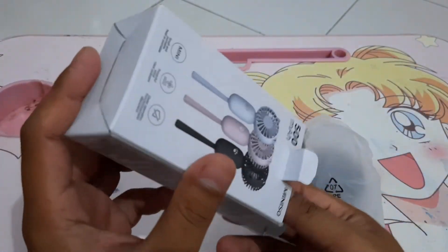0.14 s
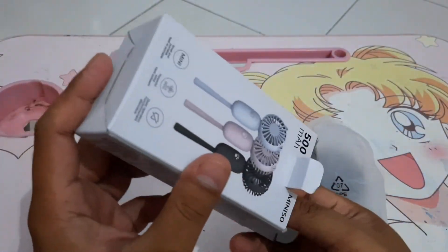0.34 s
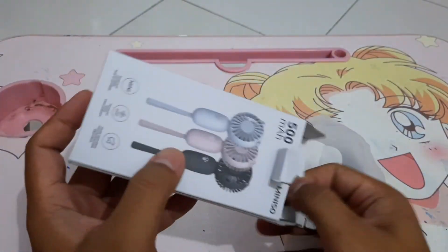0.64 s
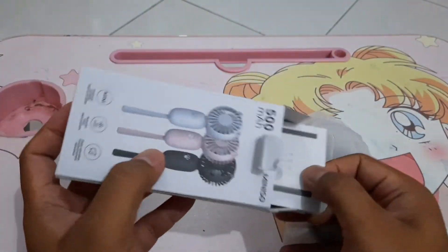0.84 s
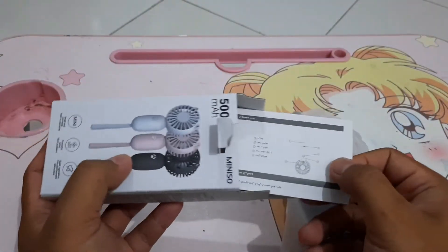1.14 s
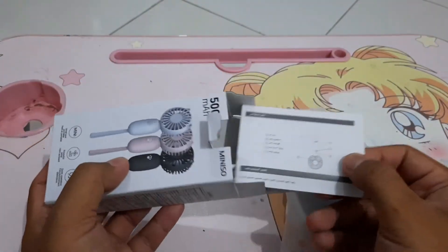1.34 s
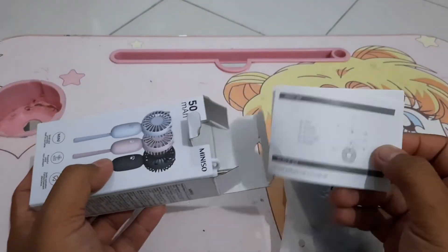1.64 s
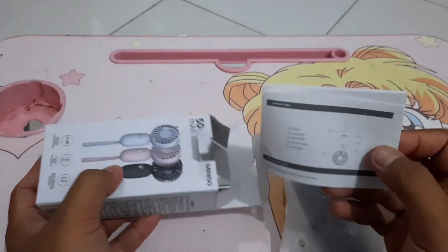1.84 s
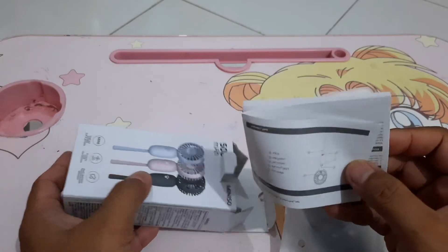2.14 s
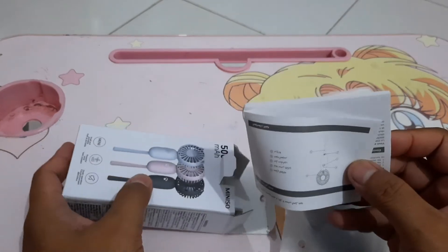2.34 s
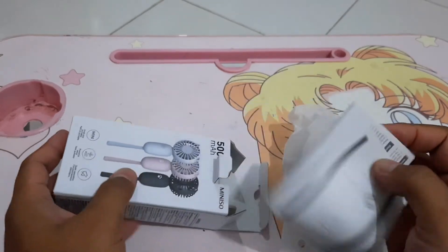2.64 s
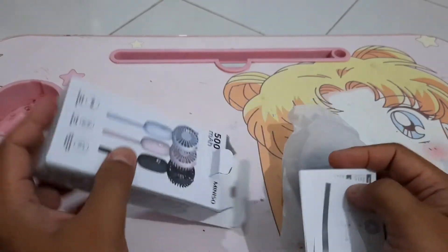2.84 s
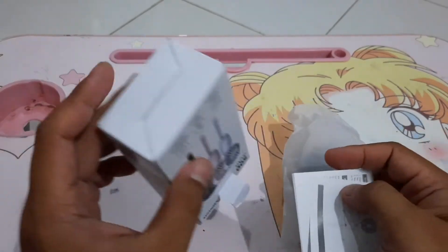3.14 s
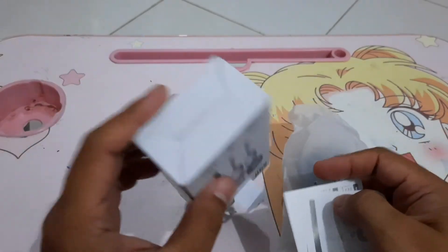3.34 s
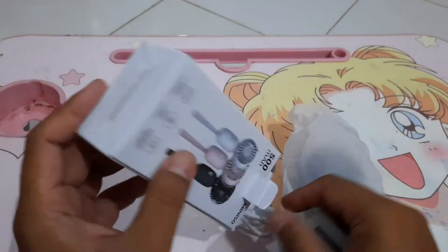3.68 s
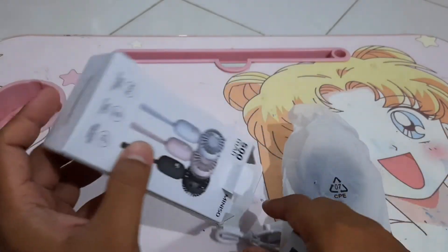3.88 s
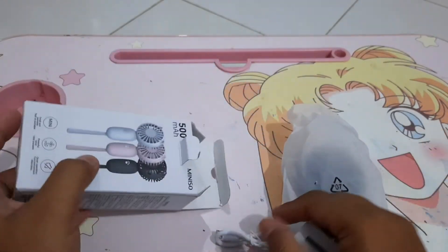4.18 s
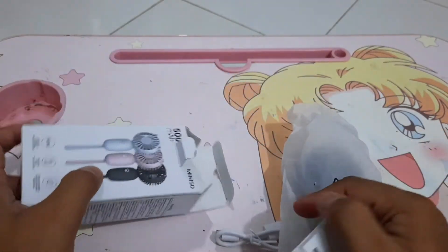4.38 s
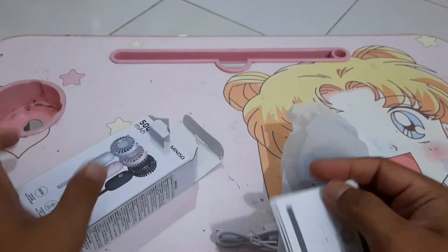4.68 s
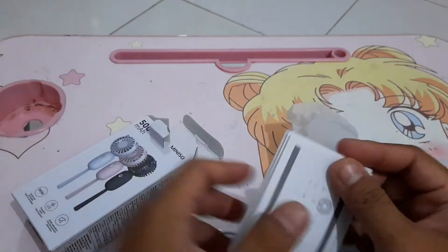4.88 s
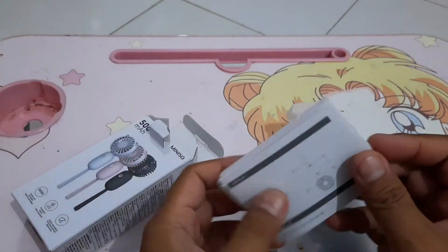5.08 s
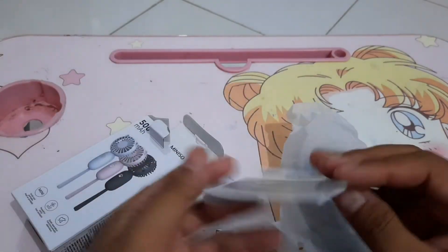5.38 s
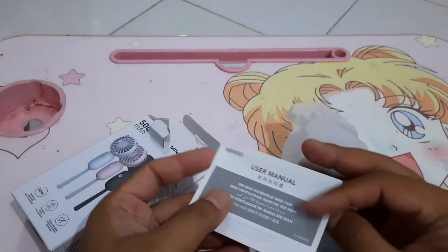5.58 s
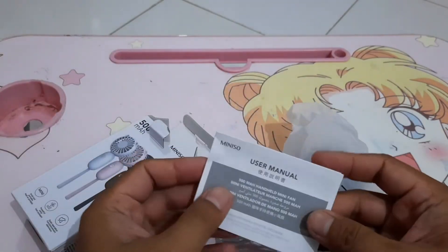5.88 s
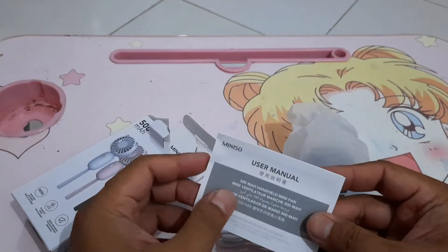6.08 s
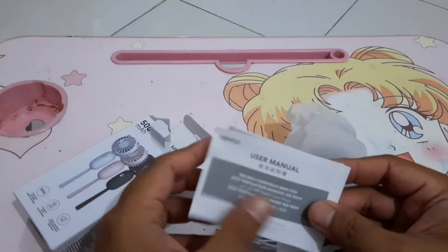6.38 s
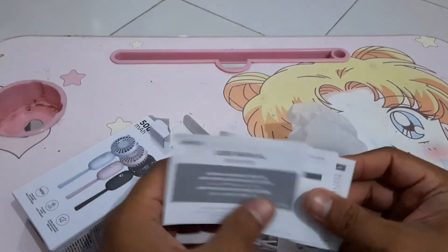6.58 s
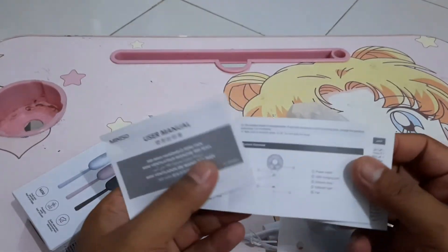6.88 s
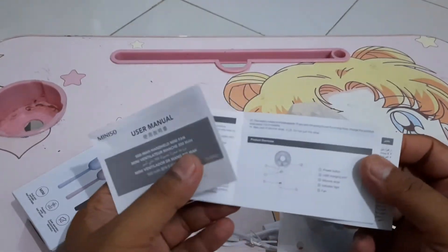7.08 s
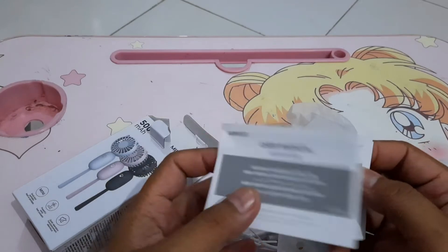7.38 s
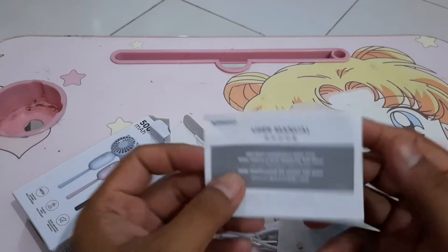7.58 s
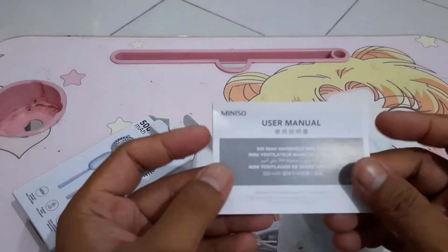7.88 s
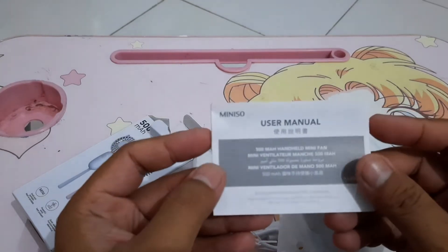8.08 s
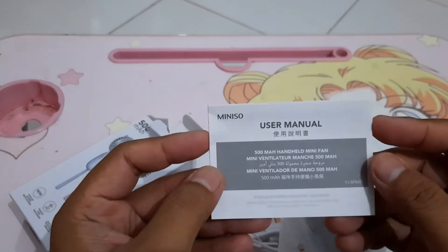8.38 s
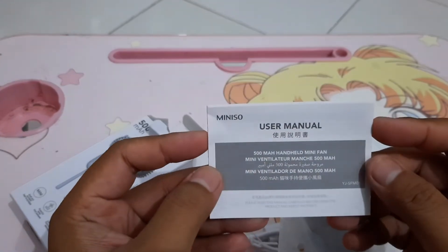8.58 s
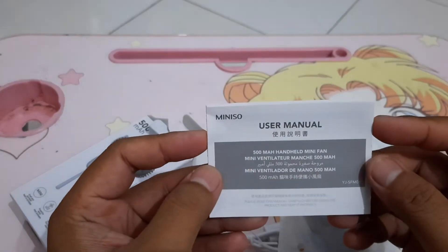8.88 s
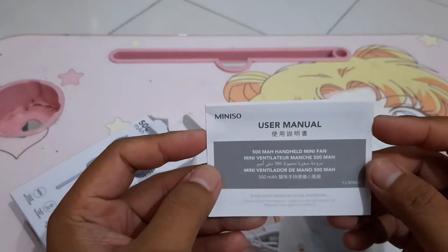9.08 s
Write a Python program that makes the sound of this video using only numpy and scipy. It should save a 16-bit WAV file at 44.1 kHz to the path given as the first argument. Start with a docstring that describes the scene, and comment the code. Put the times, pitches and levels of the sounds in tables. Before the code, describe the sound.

Close handling of a thin card box with hollow scrapes and a burst of knocks, a hard drop, then quiet leaflet rustling indoors.

```python
"""Hands shake a small cardboard box, pull a folded leaflet out of it, drop the box on a table mat
and unfold the leaflet, close to a two-port microphone in a quiet room with a low wavering drone.
Rubbing, sliding and creasing are shaped noise; blows ring the box's resonances and card panels pop
on single notes. Echoes make the room's tail; its air is soft hush, drone lines and a swelling rumble."""
import sys
import numpy as np
from scipy import signal
from scipy.fft import rfft, irfft
from scipy.io import wavfile
from scipy.ndimage import uniform_filter1d

SR = 44100
rng = np.random.default_rng(int(sys.argv[2]) if len(sys.argv) > 2 else 0)


def master_out(mix):
    """Clip the mix to full scale and print it as 16-bit PCM to the path in sys.argv[1]."""
    frames = np.transpose(np.atleast_2d(mix))
    ceiling = np.clip(frames, -1, 1)
    pcm = np.round(ceiling * 32767).astype(np.int16)
    wavfile.write(sys.argv[1], SR, pcm)


N = 407043  # length of the scene [samples]

# resonances (modes) of the box: (pitch [Hz], basic width [Hz], relative level [dB])
BOX_MODES = [(325, 96, 11.5), (522, 145, 8.5), (758, 120, 7.5), (937, 190, 7.5), (1404, 240, 3),
             (1670, 78, 2.5), (1844, 160, 4.5), (2170, 190, -2.5), (2485, 780, -8), (3030, 282.5, -7.5),
             (3680, 2200, -12)]
# how far the left port leads for sounds from the hands: (frequency [Hz], lead [radians])
LEFT_LEAD = [(250, 0), (900, .9), (2200, 1.5), (4500, 1.1), (8000, .3)]


def gain_of(db):
    """Turns decibels into a factor."""
    return 10 ** (np.asarray(db) / 20)


def evened(x):
    """Scales a signal to an average (rms) strength of 1."""
    return x / np.sqrt(np.mean(x ** 2) + 1e-20)


def read(points, hz):
    """Reads a table of (frequency, value) at any frequency, on a log-frequency axis."""
    f, value = np.transpose(points)
    return np.interp(np.log(hz + 1), np.log(f + 1), value)


def columns(rows, t):
    """Reads each column of a table of (time, values...) at the times t."""
    s, *rest = np.transpose(rows)
    return [np.interp(t, s, column) for column in rest]


def add(mix, s, sound):
    """Mixes a sound in at s seconds."""
    part = mix[round(s * SR):][:len(sound)]
    part += sound[:len(part)]


def resonate(x, hz, width):
    """Sends a sound through a two-pole resonance with gain 1 at its peak."""
    return signal.lfilter(*signal.iirpeak(hz, hz / width, SR), x)


def highpass(x, order, hz):
    """Takes away what lies below hz."""
    return signal.sosfilt(signal.butter(order, hz, "high", fs=SR, output="sos"), x)


def glide(hz, width):
    """Noise through a steep resonance that follows the pitch curve hz."""
    turn = np.exp(2j * np.pi * np.cumsum(hz) / SR)
    pole = np.exp(-np.pi * width / SR)
    # shift the noise down by the pitch, keep what is near zero, shift it back up
    lowered = rng.standard_normal(len(hz)) / turn
    narrow = signal.lfilter([1], np.poly([pole, pole]), lowered)
    return evened((turn * narrow).real)


def grit():
    """Friction: dense noise whose strength jitters within milliseconds, with sparse harder slips."""
    jitter = evened(uniform_filter1d(rng.standard_normal(N), size=60))
    hits = (rng.random(N) < 150 / SR) * rng.random(N)  # about 150 slips a second
    slips = signal.lfilter([1], [1, -.97], hits)  # each dies away at once
    return evened(rng.standard_normal(N) * gain_of(2.5 * jitter) * (1 + 2.2 * slips))


def paper_bands():
    """Grit in the colour of paper, split into a dull and a bright part."""
    # colour of paper noise: (frequency [Hz], relative level per Hz [dB])
    paper_colour = [(900, -16), (2000, 3), (3200, -7), (4500, -12.5), (6500, -13), (10000, -16.5),
                    (13000, -15.5), (16000, -23.5)]
    hz = np.fft.rfftfreq(N, 1 / SR)
    spectrum = rfft(grit()) * gain_of(read(paper_colour, hz))
    bright = 1 / (1 + (4500 / (hz + 1)) ** 6)  # the split lies at 4500 Hz
    return evened(irfft(spectrum * (1 - bright), N)), evened(irfft(spectrum * bright, N))


def strokes(rows, rise_db_s, fall_db_s):
    """Strength curves of strokes that set in, glide in level and let go: main part first, then others."""
    t = np.arange(N) / SR
    power = np.zeros((len(rows[0]) - 3, N))
    for s, length, start_db, end_db, *parts_db in rows:
        near = slice(max(round((s - .3) * SR), 0), round((s + length + .4) * SR))
        u = t[near] - s
        db = np.interp(u, [0, length], [start_db, end_db])
        db = db + rise_db_s * np.minimum(u, 0)
        db = db - fall_db_s * np.maximum(u - length, 0)
        # the other parts follow the main one at their own offsets
        power[:, near] += gain_of(db + np.r_[0, parts_db][:, None]) ** 2
    return np.sqrt(power)


def rubbing():
    """Friction of card on card drives the box modes; a loose grip frees the hollow low ones."""
    # strokes of card along card: (start [s], length [s], level at start [dB], level at end [dB],
    # hollow low modes over that level [dB], surface hiss over that level [dB])
    card_strokes = [(0.03, 0.14, -51, -70.5, 4, -12), (0.15, 0.14, -46.5, -62.5, -2, -12),
                    (0.34, 0.053, -55, -54.5, -8, -15), (0.54, 0.077, -40.5, -45, -2, -17.5),
                    (0.68, 0.038, -38, -31.5, -13.5, -22.5), (0.73, 0.047, -45, -48, -2, -12.5),
                    (0.89, 0.19, -47, -47, -11, -14), (1.145, 0.058, -45, -46, -11.5, -15),
                    (1.31, 0.13, -54, -47.5, -16.5, -13.5), (1.492, 0.0091, -39, -45.5, -4, -6),
                    (2.15, 0.13, -62, -59.5, -3, -16), (3.0, 0.057, -52.5, -39.5, 4, -15.5),
                    (3.1, 0.25, -59, -52, 7.5, -14.5), (3.36, 0.072, -46, -49, 4.5, -15.5),
                    (3.455, 0.037, -45, -45.5, 6, -19), (3.58, 0.2, -38.5, -38.5, -2.5, -19.5),
                    (3.81, 0.035, -39.5, -35.5, -4, -15), (3.88, 0.1, -49, -58, -2.5, -13),
                    (4.155, 0.27, -55.5, -75, 3.5, -14.5), (4.455, 0.056, -52, -45.5, -14, -17.5),
                    (4.575, 0.19, -33.5, -54, -1.5, -15.5)]
    # how fast a stroke sets in and lets go [dB/s]
    level, hollow, hiss = strokes(card_strokes, rise_db_s=489, fall_db_s=361.5)
    drive, modes = grit(), []
    for hz, width, db in BOX_MODES:
        # shifting fingers feed each mode unevenly, in steps of 10 ms
        grip = evened(uniform_filter1d(rng.standard_normal(N // 441 + 1), size=6))
        grip = np.repeat(grip, 441)[:N]
        rough = drive * rng.choice([-1, 1], N) * gain_of(2.0 * grip)
        ringing = resonate(resonate(rough, hz, 0.9 * width), hz, 2.2 * width)
        modes.append(gain_of(db) * ringing)
    low_modes, high_modes = evened(sum(modes[:2])), evened(sum(modes[2:]))
    return hollow * low_modes + level * high_modes + hiss * paper_bands()[1]


def knocks():
    """Each blow slaps twice within milliseconds and rings the modes nearest its pitch, with a short crack."""
    # blows on the box: (time [s], peak of the ring before the filters below [dB],
    # favoured pitch [Hz], crack over the ring [dB])
    blows = [(0.017, -20.5, 426, -6), (0.145, -24.5, 990, -5.5), (0.463, -29.5, 1190, -17),
             (0.553, -22, 1020, -6), (0.582, -21, 3140, -6), (1.14, -37, 700, -22), (1.489, -43, 670, -21),
             (1.514, -29.5, 332, -25), (1.752, -47.5, 1000, -7), (2.201, -38, 970, -37),
             (3.033, -30.5, 520, -1.5), (3.189, -27.5, 513, -17), (3.241, -33.5, 746, -32),
             (3.3387, -17.5, 575, -0.5), (3.350, -22.5, 610, 0.5), (3.392, -31.5, 530, -1),
             (3.408, -26, 900, -6), (3.456, -22, 605, -7), (3.475, -29, 350, -20), (3.45, -26, 740, -23),
             (3.535, -30.5, 740, -6), (3.564, -23, 630, -28), (3.58, -26.5, 966, -21), (3.6, -37, 1070, 1),
             (3.612, -25, 1400, -14), (3.618, -31, 945, 6), (3.634, -18.5, 402, -12.5),
             (3.653, -23, 398, -16), (3.675, -25, 447, 1), (3.685, -17.5, 386, -16), (3.705, -16, 378, -6),
             (3.722, -22, 970, -2), (3.736, -24, 1110, -1), (3.776, -31, 447, -1), (3.806, -25, 1630, 2.5),
             (3.823, -27.5, 1180, 1), (3.846, -20, 455, 0.5), (4.135, -39, 945, -24),
             (4.5566, -2, 707, -2.5), (4.5618, -13.5, 496, -22), (4.68, -29.5, 990, 0),
             (4.692, -24, 470, -24.5), (5.546, -44, 1740, -4.5), (6.203, -36, 1280, 1),
             (7.046, -40, 506, -24), (7.183, -36, 510, -11)]
    out, t = np.zeros(N), np.arange(2500) / SR
    hz, width, mode_db = np.array(BOX_MODES).T[:, :, None]
    for s, db, pitch_hz, crack_db in blows:
        near_db = mode_db - 7.7 * abs(np.log2(hz / pitch_hz))  # weaker by 7.7 dB an octave away
        decay_db = 60 * t / 0.018 * (width / 100) ** 0.18  # wide modes die first
        detuned_hz = hz * rng.uniform(0.96, 1.04, hz.shape)
        ring = gain_of(near_db - decay_db) * np.sin(2 * np.pi * detuned_hz * t)
        onset = np.sin(np.pi / 2 * np.minimum(t / 0.00093, 1)) ** 2
        ring = ring.sum(0) * onset
        add(ring, rng.uniform(0.002047, 0.005006), 0.3 * ring)  # the second slap
        # the card buckles for a few milliseconds
        burst = rng.standard_normal(len(t)) * np.exp(-(t / .0024) ** 2)
        crack = sum(gain_of(d) * resonate(burst, f, 2.4 * w) for f, w, d in BOX_MODES[5:10])
        crack = resonate(crack, 1800, 2600) + 0.019 * burst
        blow = ring / abs(ring).max() + gain_of(crack_db) * crack / abs(crack).max()
        add(out, s + .001, gain_of(db) * blow)  # every blow starts 1 ms after its listed time
    out = signal.lfilter(*signal.iirnotch(1380, 3.5, SR), out)  # the echo off the mat cancels one band
    return highpass(out, 5, 290)  # a small box sends out no bass


def pops():
    """A panel of card pops over and rings on one note, with a quick swell and a slower fall."""
    # pops: (time [s], peak level [dB], pitch [Hz], half of the time the note lasts [s])
    panel_pops = [(0.198, -32.5, 2010, 0.0024), (0.55, -22.5, 1630, 0.0035), (0.563, -27, 903, 0.0048),
                  (0.5814, -14, 1683, 0.0081), (0.697, -27.5, 900, 0.0066), (0.704, -36, 950, 0.0031),
                  (0.708, -36, 2390, 0.014), (0.921, -32.5, 986, 0.01), (1.368, -40, 1810, 0.0089),
                  (2.25, -44, 970, 0.011), (2.326, -49, 980, 0.0066), (2.843, -47.5, 1020, 0.0078),
                  (4.556, -14, 1696, .007), (6.593, -51, 3100, 0.009)]
    out = np.zeros(N)
    for s, db, pitch_hz, length in panel_pops:
        t = np.arange(round(2 * length * SR)) / SR
        u = t / (.27 * length)
        swell = u * np.exp(1 - u)  # peaks at u = 1
        add(out, s, gain_of(db) * swell * np.sin(2 * np.pi * pitch_hz * t))
    return out


def skid():
    """The box skids down onto the mat: a swish slides down in pitch as the gap under it closes."""
    # course of the swish: (time [s], level [dB], resonance [Hz])
    swish = [(4.435, -64, 1153), (4.46, -50.5, 1027), (4.51, -46.5, 744.5), (4.535, -49.5, 370),
             (4.556, -53.5, 325.8)]
    t = np.arange(N) / SR
    db, hz = columns(swish, t)
    sounding = (t > swish[0][0]) & (t < swish[-1][0])
    return gain_of(db) * sounding * glide(hz, 420)


def rustling():
    """Paper slides under fingers: bright hiss, and a duller part that sings where the sheet bends."""
    # strokes of paper: (start [s], length [s], level at start [dB], level at end [dB],
    # dull part over that level [dB])
    paper_strokes = [(1.98, 0.078, -66.5, -53, -7), (2.235, 0.012, -67, -61, -5),
                     (2.64, 0.096, -62, -76, -5.5), (2.85, 0.031, -61, -55.5, -0.5),
                     (5.05, 0.18, -63, -70.5, -0.5), (5.3, .13, -68, -64, -4.5),
                     (5.56, 0.063, -70.5, -65, -4), (6.2, 0.0058, -71, -59, 4.5),
                     (6.54, 0.2, -63, -58.5, -1), (6.8, 0.27, -64, -69.5, -2), (7.18, 0.24, -60.5, -68, -4),
                     (7.4, 0.01, -64, -58, 0.5), (7.54, 0.071, -61.5, -63.5, -3.5),
                     (7.715, 0.016, -64.5, -62.5, -5)]
    # the turning page bends: (time [s], its resonance [Hz])
    page_bend = [(6.3, 3280), (6.58, 3540), (6.65, 3320), (6.69, 2550), (6.77, 2230), (6.84, 3360),
                 (7.0, 3170)]
    # how fast a stroke sets in and lets go [dB/s]
    level, dull_level = strokes(paper_strokes, rise_db_s=305, fall_db_s=247)
    dull, bright = paper_bands()
    bend = glide(columns(page_bend, np.arange(N) / SR)[0], 1200)
    return level * bright + dull_level * evened(dull + 1.3 * bend)


def airy():
    """Scrapes and the dropped box's tail: noise through one resonance, wandering in pitch and strength."""
    # narrow or broad tones: (start [s], length [s], level at start [dB], level at end [dB],
    # middle pitch [Hz], width setting of the resonance [Hz])
    tones = [(0.88, .34, -53, -51, 1830, 150), (1.34, .13, -54, -57, 1800, 120),
             (.9, .2, -56, -54, 3000, 1800), (2.3, .4, -70, -70, 1640, 140),
             (4.566, .11, -36, -52, 2250, 450), (4.568, .09, -28, -42, 720, 230),
             (6.29, .15, -72, -71, 3250, 600)]
    out = np.zeros(N)
    for s, length, start_db, end_db, pitch_hz, width in tones:
        t = np.arange(round(length * SR)) / SR
        wander = evened(uniform_filter1d(rng.standard_normal((2, len(t))), size=1200))
        tone = glide(pitch_hz * (1 + .025 * wander[0]), width) * gain_of(2.5 * wander[1])
        edge = np.clip(np.minimum(t, length - t) / 0.01, 0, 1)  # 10 ms fades
        level = gain_of(start_db + (end_db - start_db) * t / length)
        add(out, s, edge * level * tone)
    return out


def ticks():
    """A crease of paper snaps over: a burst of a few milliseconds through a broad resonance."""
    # snaps: (time [s], peak level [dB], pitch [Hz])
    snaps = [(0.138, -27.5, 2210), (0.5033, -38.5, 5000), (2.0265, -36, 3480), (2.743, -42.5, 8200),
             (2.803, -45.5, 2780), (2.833, -43.5, 2380), (3.63, -31, 3100), (3.6603, -26.5, 5900),
             (4.2287, -48, 4150), (4.339, -49, 8300), (4.396, -38.5, 6600), (4.777, -34, 2586),
             (5.0483, -35, 6550), (5.152, -34.5, 4430), (5.193, -47, 2360), (5.21, -45.5, 8000),
             (5.359, -41, 2900), (5.4096, -48.5, 8470), (5.636, -47.5, 9000), (5.7324, -42, 11330),
             (6.213, -46, 3300), (6.469, -40, 3200), (6.813, -42.5, 2560), (6.847, -49.5, 3430),
             (6.919, -51, 8100), (7.3843, -37, 2490), (7.412, -45, 3250), (7.418, -42, 1820),
             (7.429, -48, 2500), (7.485, -47, 4000), (7.555, -40.5, 3160), (7.731, -43, 8000)]
    out, t = np.zeros(N), np.arange(800) / SR
    for s, db, pitch_hz in snaps:
        burst = rng.standard_normal(len(t)) * np.exp(-(t / 0.0023) ** 2)
        burst = resonate(burst, pitch_hz, 1.1 * pitch_hz)
        burst = resonate(burst, pitch_hz, 1.6 * pitch_hz)
        add(out, s, gain_of(db) * burst / abs(burst).max())
    return out


def ports(x):
    """Near sounds reach the left port a little ahead, most of all in the middle range."""
    half_lead = .5j * read(LEFT_LEAD, np.fft.rfftfreq(N, 1 / SR))
    turn = np.exp(half_lead * np.array([[1], [-1]]))
    return irfft(rfft(x) * turn, N)


def spread(x):
    """Table and moving hands scatter the treble, unlike at the two ports and changing all the time."""
    scatter = rng.standard_normal((3, 300)) * np.exp(-np.arange(300) / 70)
    scatter /= np.linalg.norm(scatter, axis=1, keepdims=True)
    treble = highpass(x, 2, 1500)
    # three scattered paths take turns, 7 rounds a second
    cycle = np.arange(N) / SR * 7 + np.arange(3)[:, None] / 3
    turn = np.cos(2 * np.pi * cycle) * np.sqrt(2 / 3)
    paths = signal.oaconvolve(treble * turn, scatter, axes=1)
    return paths.sum(0)[:N] * np.array([[1], [-1]])  # opposite sign at the two ports


def room(x):
    """Room echoes: sparse taps of random sign, each frequency band dying at its own speed."""
    # how long echoes last: (frequency [Hz], time to fall by 60 dB [s])
    echo_time = [(300, 0.344), (2000, 0.28), (12000, 0.27)]
    taps = np.zeros((2, SR // 2))
    at = np.arange(60, SR // 2 - 20, 20)
    at = at + rng.integers(0, 20, (2, len(at)))
    np.put_along_axis(taps, at, rng.choice([-1., 1.], at.shape), 1)
    hz, t, z = signal.stft(taps, SR, nperseg=256)
    fading = gain_of(-60 * t / read(echo_time, hz)[:, None])
    tail = signal.istft(z * fading, SR, nperseg=256)[1]
    return signal.fftconvolve(x[None], tail / np.linalg.norm(tail[0]), axes=1)[:, :N]


def air_hush():
    """The steady hush of the room air: noise with slowly changing patches, partly alike at both ports."""
    # colour of the hush: (frequency [Hz], relative level per Hz [dB])
    air_colour = [(20, -54), (55, -14.5), (90, -10), (300, -14.5), (420, -22.5), (1000, -27), (1350, -33),
                  (1600, -27.5), (2300, -30.5), (3300, -38.5), (6200, -35.5), (7300, -40.5), (8600, -38),
                  (11500, -43), (15500, -48)]
    # likeness of the air at the two ports: (frequency [Hz], likeness from 0 to 1)
    likeness = [(60, .97), (250, .92), (700, .5), (3000, .4), (8000, .6), (15000, .95)]
    frames, hz = N // 512 + 5, np.fft.rfftfreq(2048, 1 / SR)
    a, b, c, d, patches = rng.standard_normal((frames, 1025, 5)).T
    patches = evened(uniform_filter1d(uniform_filter1d(patches, 20, 0), 8, 1))
    # slower and wider than the patches
    swells = evened(uniform_filter1d(uniform_filter1d(patches, size=30, axis=0), size=40, axis=1))
    same = np.clip(read(likeness, hz), -1, 1)[:, None]
    left, other = a + 1j * b, c + 1j * d
    # the air comes from the side opposite the hands
    from_right = np.exp(1.3j * read(LEFT_LEAD, hz)[:, None])
    z = np.array([left, same * left * from_right + np.sqrt(1 - same ** 2) * other])
    low_swells = swells * (hz < 3000)[:, None]
    z *= gain_of(read(air_colour, hz)[:, None] + 1.2 * patches + 1.1 * low_swells)
    hush = signal.istft(z, nperseg=2048, noverlap=1536)[1][:, :N]
    # the part above 400 Hz, averaged over the ports, is set to -65 dB
    top = highpass(hush.mean(0), 4, 400)
    return hush * gain_of(-65) / np.sqrt(np.mean(top ** 2))


def fuzzy_line(hz, width, own):
    """A fuzzy hum: noise through a resonance twice, shared by the ports plus some of each port's own."""
    noise = rng.standard_normal(N) + own * rng.standard_normal((2, N))
    return evened(resonate(resonate(noise, hz, width), hz, width))


def drone():
    """The low wavering drone: a few fuzzy lines of narrow noise."""
    # lines: (pitch [Hz], width of each resonance pass [Hz], level [dB])
    lines = [(98.6, 17.3, -56.5), (142.5, 7.3, -67.5), (237.5, 8.1, -68), (335.65, 8.7, -64)]
    return sum(gain_of(db) * fuzzy_line(hz, width, own=0.45) for hz, width, db in lines)


def rumble():
    """Distant traffic in the lowest room mode: a fuzzy hum and a wavering note that swell together."""
    # swelling of the rumble: (time [s], level [dB])
    swelling = [(0, -84), (.97, -54.5), (1.34, -73), (1.62, -51.5), (1.98, -47.5), (2.36, -68),
                (3.06, -49.5), (4.34, -67.5), (5.09, -53), (5.6, -81), (7.43, -53.5), (7.84, -71.5),
                (9.23, -58.5)]
    mode_hz = 68.8
    hum = fuzzy_line(mode_hz, 16.9, own=0.16)
    wobble = 1 + .05 * evened(uniform_filter1d(rng.standard_normal(N), size=8000))
    note = np.sqrt(2) * np.sin(2 * np.pi * np.cumsum(mode_hz * wobble) / SR)  # the mode holds its note
    return evened(0.6 * hum + note) * gain_of(columns(swelling, np.arange(N) / SR)[0])


def scene():
    """Box and paper, their room tail and the room air; pops aim at the microphone and stir the room less."""
    box = rubbing() + knocks() + skid()
    paper = rustling() + ticks()
    hands = box + paper + airy()
    notes = pops()
    near = hands + notes
    direct = ports(near) + 0.51 * spread(near)
    tail = gain_of(-9) * room(hands + .5 * notes)
    return direct + tail + air_hush() + drone() + rumble()


def record(dry):
    """The left port is the more sensitive; full scale clips; then the treble ends at a band limit."""
    # balance of the ports: (frequency [Hz], left minus right [dB])
    port_balance = [(60, 4), (250, 2.7), (700, 5.6), (2400, 4.6), (10000, 2.8)]
    balance_db = read(port_balance, np.fft.rfftfreq(N, 1 / SR))
    lean = gain_of(balance_db * np.array([[.5], [-.5]]))
    full = np.clip(irfft(rfft(dry) * lean, N), -1, 1)
    band_limit = signal.firwin(511, 15900, window=("kaiser", 9), fs=SR)  # passes below 15900 Hz
    return signal.oaconvolve(full, band_limit[None], "same")


dry = scene()
out = record(dry)
master_out(out)
```